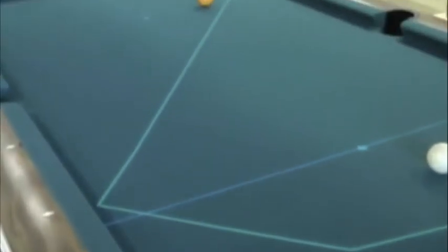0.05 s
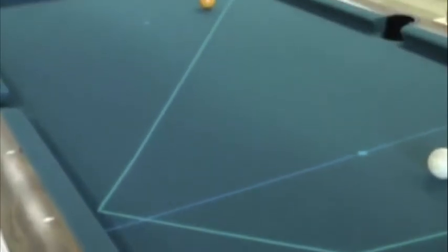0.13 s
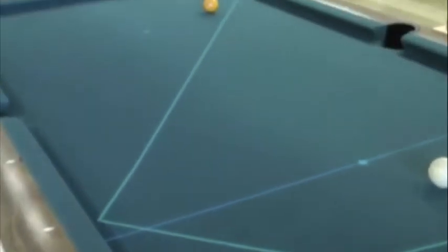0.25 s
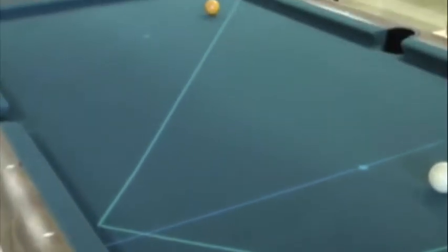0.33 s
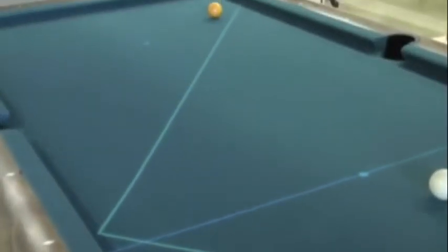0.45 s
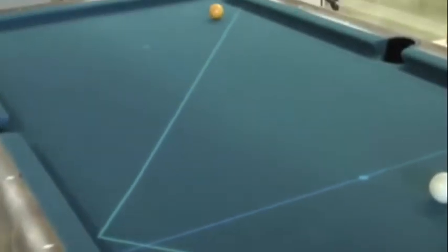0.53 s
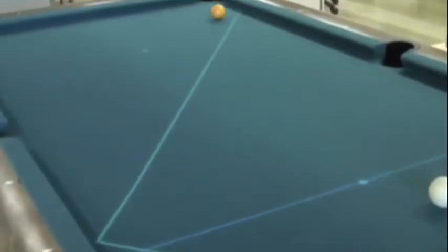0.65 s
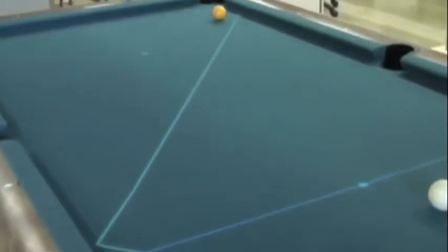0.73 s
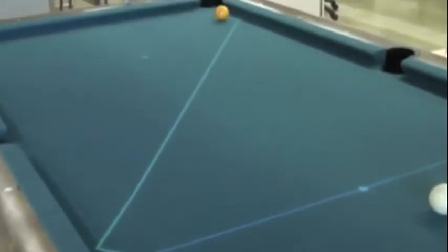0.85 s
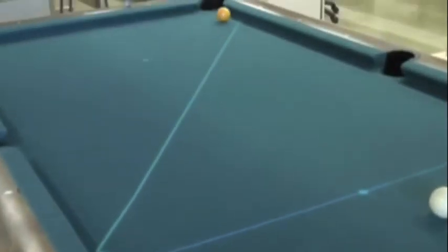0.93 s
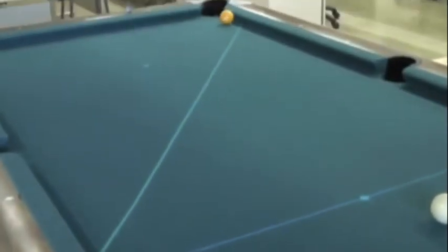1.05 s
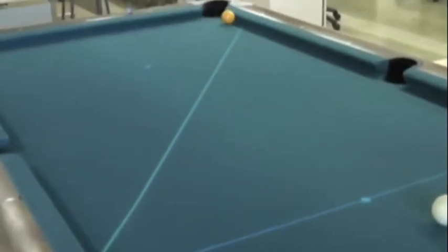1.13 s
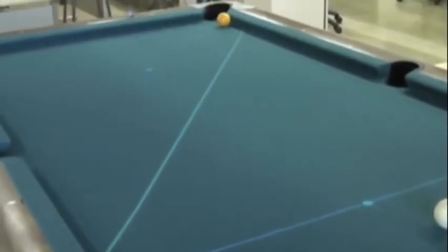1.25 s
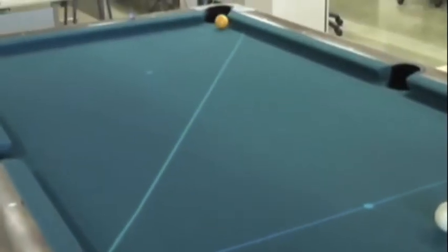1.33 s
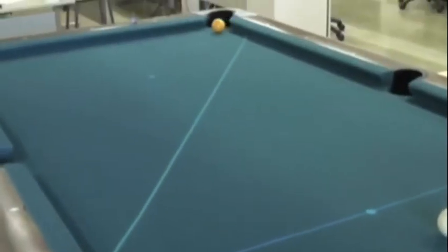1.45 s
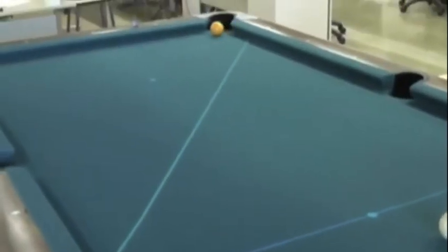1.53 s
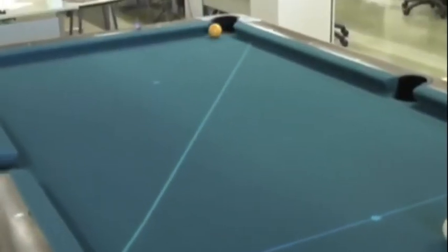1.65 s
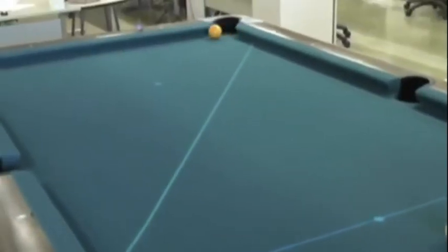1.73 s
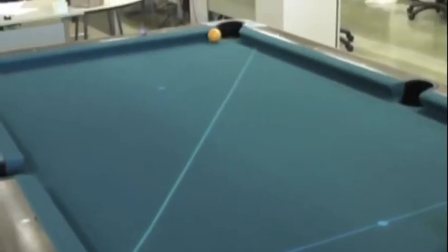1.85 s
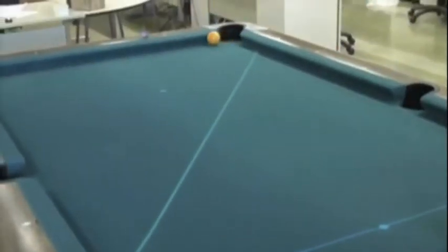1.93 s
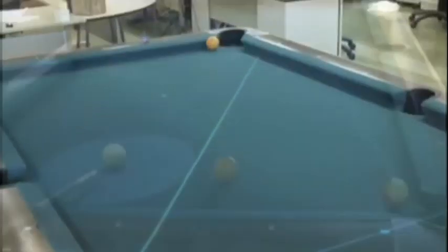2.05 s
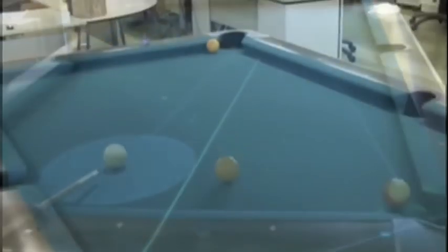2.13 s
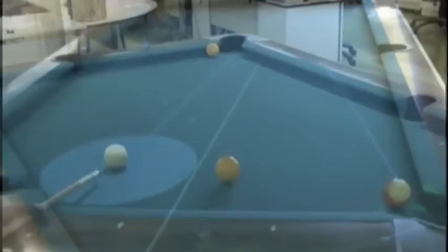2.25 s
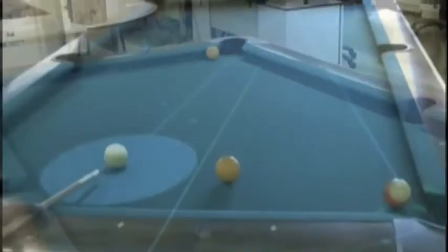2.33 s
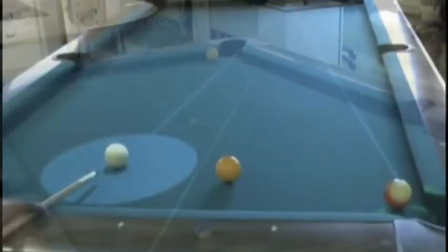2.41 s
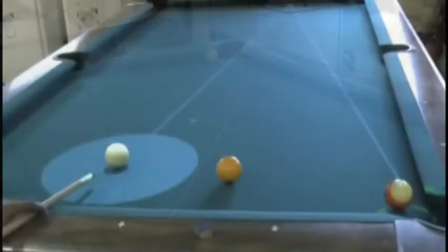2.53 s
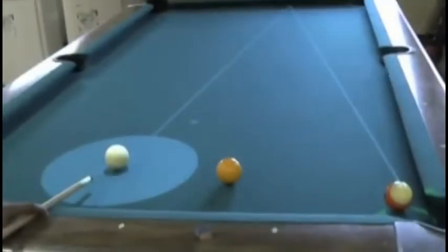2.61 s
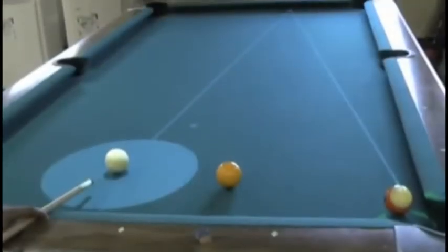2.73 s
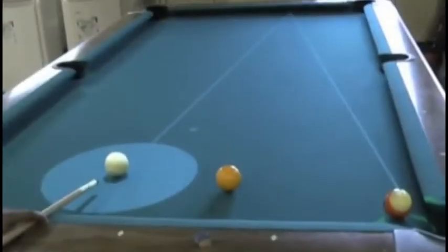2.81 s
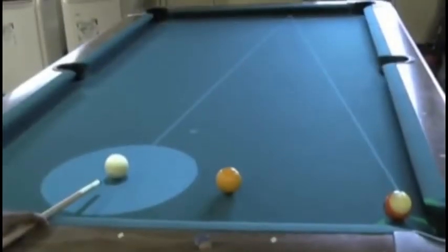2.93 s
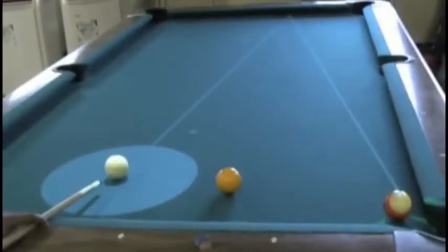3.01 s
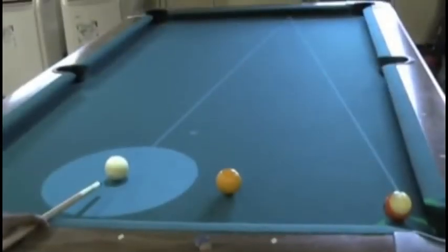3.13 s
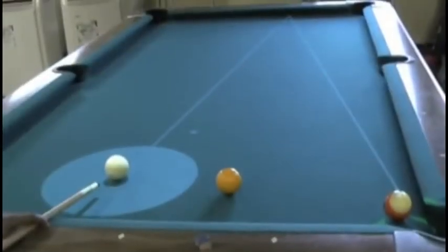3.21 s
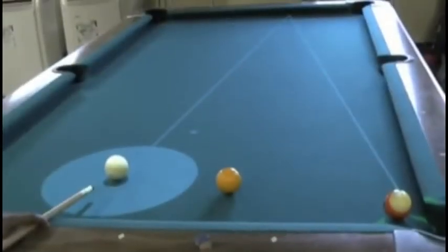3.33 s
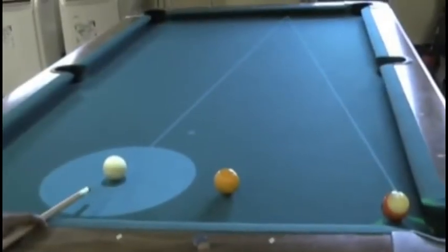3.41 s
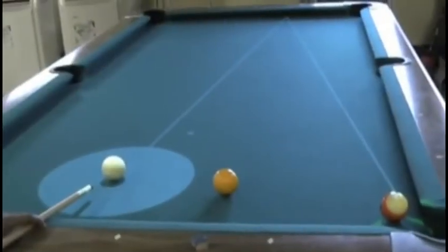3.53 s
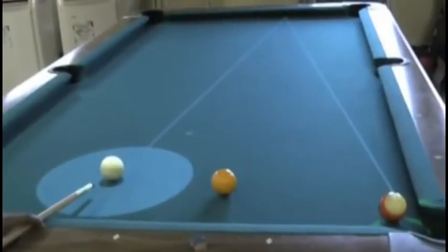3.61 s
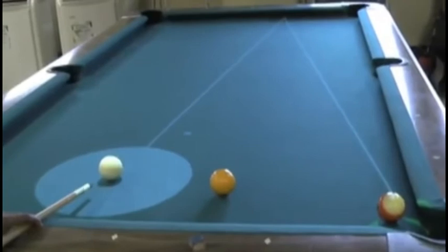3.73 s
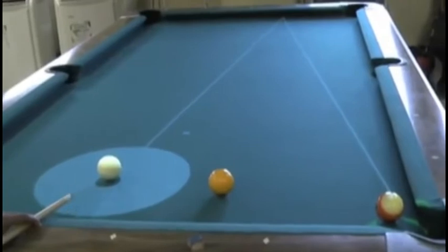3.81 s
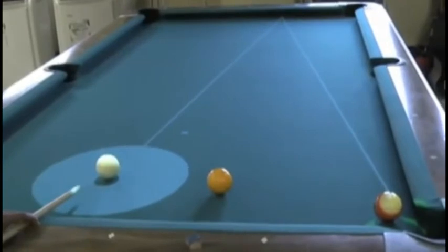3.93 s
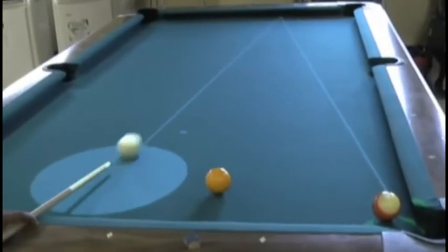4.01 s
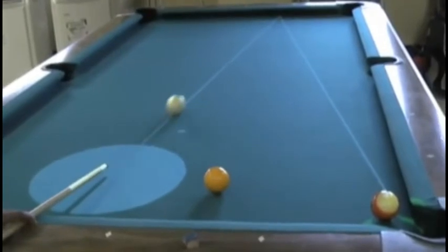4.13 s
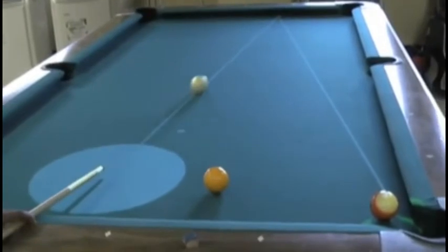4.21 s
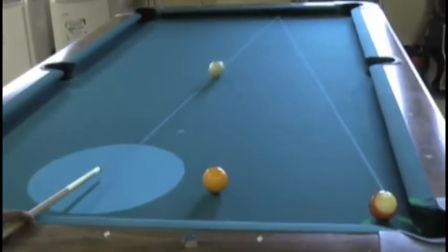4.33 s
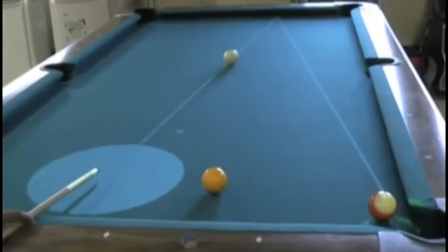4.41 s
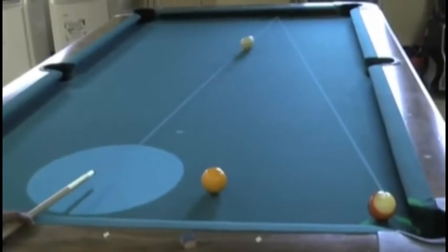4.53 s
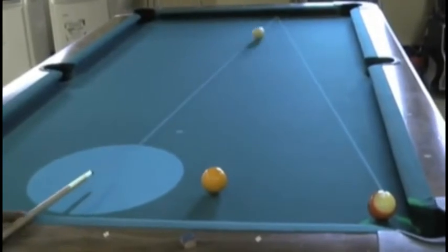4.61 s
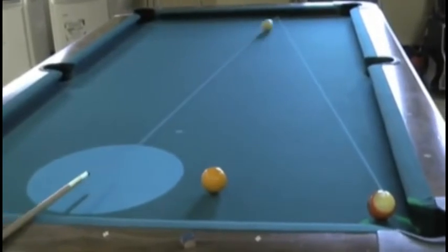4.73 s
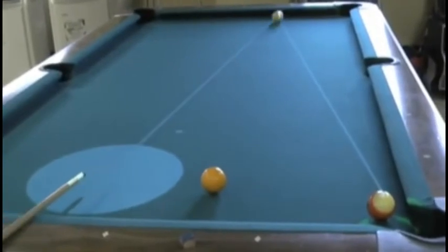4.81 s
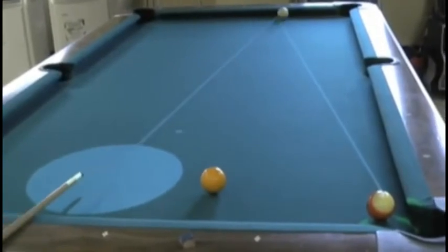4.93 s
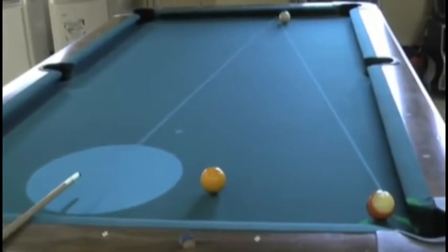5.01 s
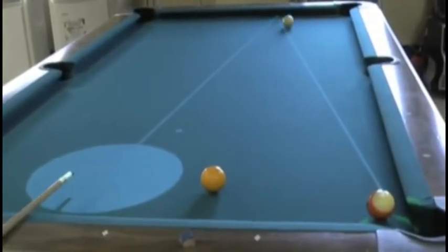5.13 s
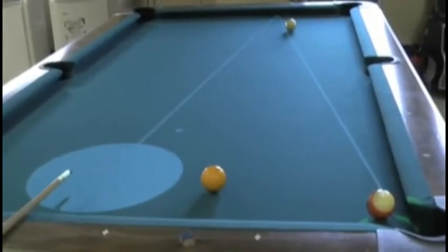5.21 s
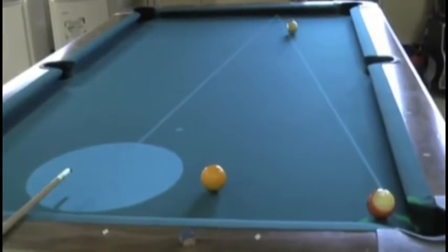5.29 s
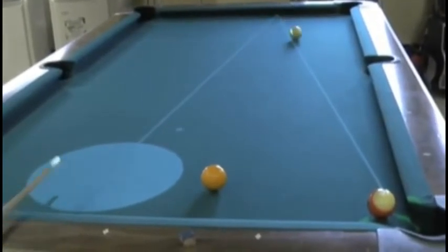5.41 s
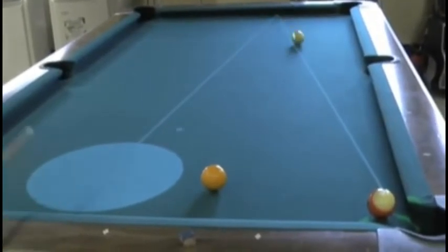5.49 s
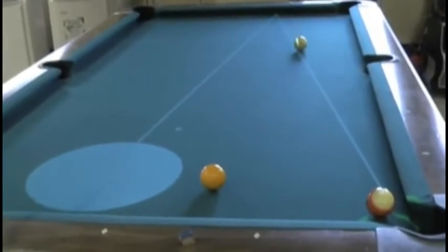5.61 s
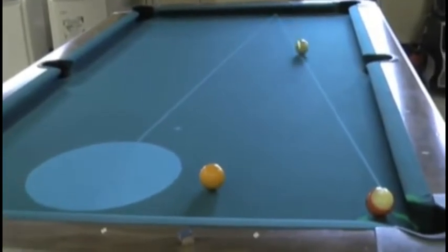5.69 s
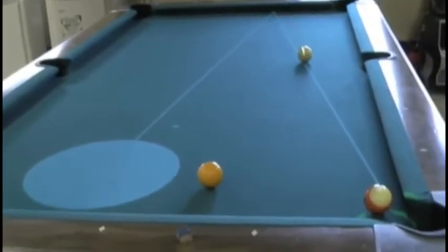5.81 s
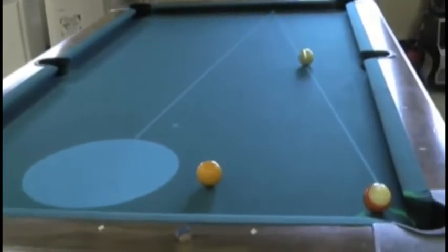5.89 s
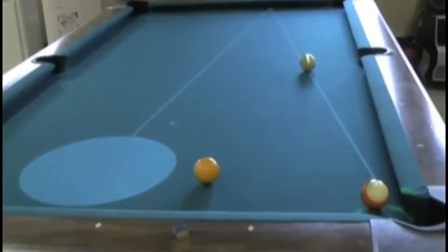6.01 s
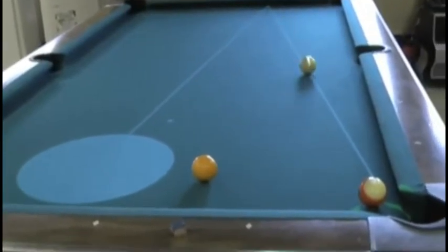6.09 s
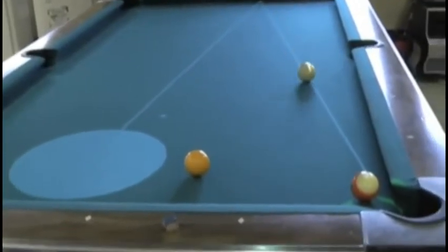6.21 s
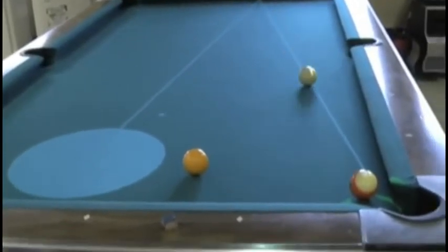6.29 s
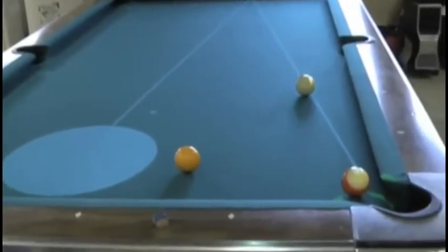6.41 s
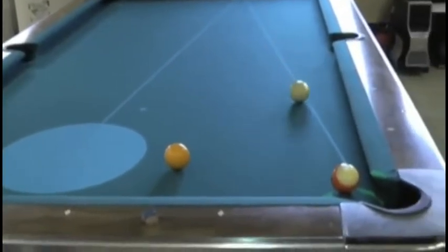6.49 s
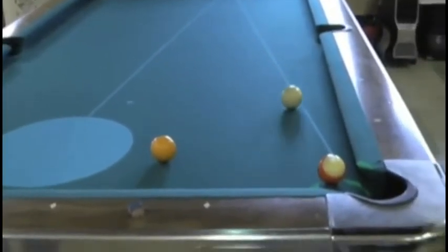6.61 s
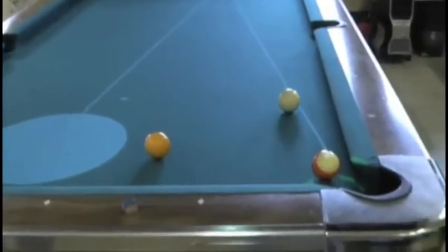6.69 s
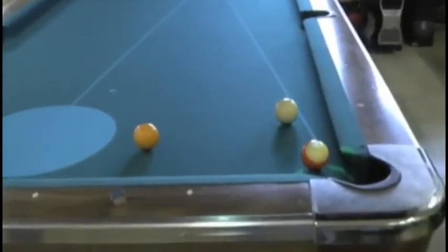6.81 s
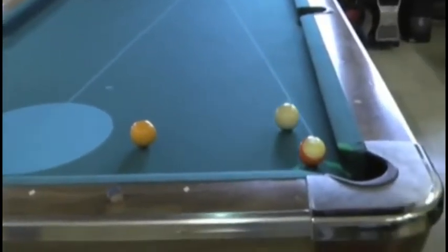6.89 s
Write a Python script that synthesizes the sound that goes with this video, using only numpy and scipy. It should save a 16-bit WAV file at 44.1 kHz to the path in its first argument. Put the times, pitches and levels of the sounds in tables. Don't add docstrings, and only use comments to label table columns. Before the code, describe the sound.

In a large, hard indoor room with steady ventilation, a ball tumbles through a pool table: pocket knocks, chute rattle, heavy tray landing, fading bumps. Then near calm until a crisp cue hit slightly left, faint rolling over cloth, a very high rubber squeak and a dull cushion thump, followed by soft foot scuffs. The small camera microphone thins the treble and briefly mutes before the hardest blows.

```python
import sys
import numpy as np
from scipy import signal
from scipy.fft import rfft, irfft, next_fast_len
from scipy.io import wavfile
from scipy.ndimage import uniform_filter1d

SR = 44100
rng = np.random.default_rng(int(sys.argv[2]) if len(sys.argv) > 2 else 0)


def gain_from_decibels(decibels):
    exponent = np.asarray(decibels, float) / 20
    return 10 ** exponent


def master_out(mix):
    frames = np.transpose(np.atleast_2d(mix))
    ceiling = np.clip(frames, -1, 1)
    pcm = np.round(ceiling * 32767).astype(np.int16)
    wavfile.write(sys.argv[1], SR, pcm)


N = 306495
TIME = np.arange(N) / SR
LEFT_RIGHT = np.array([[1], [-1]])

# (frequency [Hz], level [dB per Hz])
RUMBLE_COLOUR = [(12, -64), (20, -45.5), (82, 1.5), (135, 1), (159, -16), (184, -1), (280, -2.5),
                 (325, -17), (362, -6), (573, -10.5), (1030, -14.5), (1260, -14), (1510, -19), (1600, -20),
                 (2080, -48), (3520, -120)]
HISS_COLOUR = [(940, -32), (1600, -2), (1720, -0.5), (1960, -4), (2310, -4), (3320, -9), (4330, -14),
               (6810, -19), (12100, -20.5), (14500, -28)]
# (frequency [Hz], side minus mid [dB])
AIR_WIDTH = [(60, -18), (110, -19), (200, -14), (370, -5.5), (690, -4), (1260, -6.5), (2320, -6.5),
             (4270, -5.5), (7860, -8.5), (14400, 1)]
# (frequency [Hz], width [Hz], level [dB])
FAN_BANDS = [(285.4, 22, -61.5), (758, 25, -65.5), (1479, 36, -73.5)]
MOTOR_HZ = [934, 1017.5, 1497]
MOTOR_DB = [-65.5, -65.5, -72]
# (start [s], attack [s], hold [s], release [s], level [dB])
HISS_BURSTS = [
    (-.02, 0.016, .005, 0.026, -55),
    (.935, 0.01, 0.0071, 0.023, -49),
    (1.418, 0.0057, 0.024, 0.067, -52),
    (1.469, .005, 0.024, 0.13, -57),
    (1.646, .004, 0.0072, 0.025, -63.5),
    (1.792, 0.0046, 0.01, 0.054, -71),
    (1.4, .15, 0.33, 0.37, -65),
    (2.01, 0.011, 0.047, .1, -69),
    (3.9, 0.079, 0.058, 0.58, -68),
]
# (frequency [Hz], level against the hiss [dB])
BURST_COLOUR = [(3000, -0.5), (7000, 1.5), (11000, 1.5), (13000, -6.5), (14500, -19)]
# (frequency [Hz], time [s])
ROOM_FADE = [(60, 0.51), (250, 0.43), (1000, 0.39), (4000, 0.38), (10000, .35)]
# (frequency [Hz], side minus mid [dB])
ROOM_WIDTH = [(60, -16.5), (500, -17), (1000, -11), (2500, -8.5), (8000, -9.5), (13000, -7.5)]
# (time [s], length [s], start [Hz], end [Hz], peak level [dB])
SQUEAKS = [
    (4.66, 0.016, 8700, 8000, -42.5),
    (4.682, 0.015, 8800, 7950, -38.5),
    (4.696, 0.0062, 8700, 9200, -41),
    (4.699, 0.017, 9100, 8950, -31.5),
    (4.722, 0.015, 9740, 9490, -30),
    (4.737, 0.011, 9430, 10470, -31.5),
    (4.775, .03, 2940, 2750, -58.5),
]
# (start [s], attack [s], hold [s], release [s], level [dB])
SCUFFS = [
    (4.6, 0.041, 0.18, 0.051, -70.5),
    (5.96, 0.13, 0.086, .075, -61),
    (6.39, 0.0079, .002, 0.15, -69.5),
    (6.525, 0.027, 0.0017, 0.14, -68.5),
]
# (frequency [Hz], level [dB per Hz])
SCUFF_COLOUR = [(1180, -36), (2000, -5), (2500, -3), (3370, -8), (3790, -5.5), (9420, -6.5), (12700, -8),
                (14500, -29)]
# (frequency [Hz], level [dB])
CUE_TIP = [(35, -45), (100, -30), (250, -4.5), (460, -2.5), (730, 2), (1500, -2), (1900, -15.5), (3250, -6),
           (4000, -11), (6400, -13), (7300, -27.5), (11000, -28), (14900, -44)]
# (frequency [Hz], level [dB], time to fade 60 dB [s])
CUE_SHAFT = [(116, -10, 0.87), (238, -4.5, 0.26), (363, -7, 0.2), (763, 5.5, 0.036), (1240, -12, 0.043),
             (1497, 6, 0.057), (2470, -2.5, 0.05), (3200, -9, 0.022)]
# (frequency [Hz], level [dB], time to fade 60 dB [s])
CUSHION_FRAME = [(70.6, -27, 0.2), (107.3, -7.5, 0.38), (133.4, 3, 0.26), (218.6, -1, 0.155),
                 (293, -8, 0.154), (410, 0.5, 0.036), (557, -10.5, 0.044), (755, -3.5, 0.052),
                 (1160, -10, 0.036), (1490, -15, 0.019), (2100, -27, .02)]
# (time [s], level [dB])
CUSHION_HITS = [
    (4.866, -3),
    (4.876, -2.5),
    (4.887, -5.5),
]
# (frequency [Hz], level [dB], time to fade 60 dB [s])
CABINET = [(68.4, -16, 0.084), (102.3, -11.5, 0.27), (124.7, -5.5, 0.16), (172.8, 0, 0.11),
           (203.4, -2, 0.081), (258, 1, 0.12), (297.3, -4, 0.16), (337.4, 1, 0.092)]
PANEL = [(419, -5, 0.054), (469.5, -9, 0.061), (547.3, 0.5, 0.058), (573.5, -2, 0.073), (637, -6, 0.071),
         (687.6, -0.5, 0.056), (738, -8, 0.062), (809, -7.5, 0.038), (844, -11, 0.063)]
RAIL = [(968, 2.5, 0.032), (1083, 4, 0.056), (1154, 0, 0.051), (1265, -2.5, 0.035), (1360, -1, .04),
        (1384, -1, 0.061), (1523, -0.5, 0.052), (1645, -4.5, 0.02), (1990, -6, .03), (2180, -8.5, 0.02)]
# (frequency [Hz], level [dB])
CRACK_COLOUR = [(1300, -7.5), (1900, 6), (2600, 8), (3500, -1.5), (5000, -12), (7500, -18.5),
                (11000, -32.5), (15000, -58)]
# (time [s], strength [dB], share reaching the cabinet [dB], hardness [dB])
POCKET = [
    (0.0001, -26.5, 0, -4.5),
    (0.106, -20, -27, 6.5),
    (0.242, -18, 0.5, -4),
    (0.245, -29.5, -3, -20),
    (0.265, -24, -5, -1.5),
    (0.299, -31.5, 6.5, -17),
    (0.468, -42, 3, -14),
    (.481, -38.5, 4, -9),
    (.626, -38, 2, -16),
]
CHUTE = [
    (0.832, -14.5, -12, -0.5),
    (0.84, -11, -6.5, -6),
    (.855, -20.5, -4.5, -10),
    (0.931, -24.5, -5, 2.5),
    (.944, -12, -11.5, 3),
    (0.949, -8, -13.5, 1.5),
    (0.968, -20.5, 0.5, -11),
    (0.999, -21.5, 0, -8),
]
TRAY = [(1.426, -4.5, -7, -11), (1.444, -16.5, -5.5, -15), (1.483, -8, -11, -3.5), (1.519, -17.5, 2.5, 0.5),
        (1.586, -12, -1, -19), (1.598, -12, -6, -22), (1.661, -23.5, 7.5, -12), (1.694, -30.5, 3.5, -20.5),
        (1.713, -19.5, -1, -16), (1.725, -25, 3.5, -19), (1.797, -21.5, 5, -30), (1.86, -31.5, 8, -17),
        (1.903, -37, 8.5, -24)]
# (time [s], strength [dB], hardness [dB], crack [dB])
TICKS = [
    (0.752, -44.5, 3.5, -9),
    (2.019, -39.5, -12.5, 6.5),
    (5.094, -48, 0, -8),
    (6.402, -60, -9, 17),
    (6.537, -62.5, 25, -20),
    (6.554, -43, -1, -2),
]
# (start [s], length [s], start level [dB], end level [dB], panel share [dB])
ROLLS = [
    (0.02, 0.062, -40, -41, 3.5),
    (.42, 0.206, -43.5, -37, 0.5),
    (.63, 0.18, -37.5, -52, -5),
    (1.62, 0.29, -26.5, -34.5, -16),
    (1.92, .18, -37.5, -49.5, -21),
    (2.1, .34, -56, -59, -2),
    (4.05, 0.053, -40.5, -56, -25),
    (4.2, 0.393, -49, -51, -12),
    (4.63, 0.215, -46, -45, -13.5),
    (4.95, 0.13, -54, -58, -29),
]
# (start [s], length [s], start [dB], end [dB], panel share [dB])
CHATTER = [
    (0.139, 0.077, -22, -66, 2),
    (.3, 0.063, -41, -49, -7),
    (.865, 0.056, -38, -34, -2),
    (.985, 0.18, -26.5, -49, -14),
    (1.531, 0.085, -26.5, -36.5, 0.5),
]
# (frequency [Hz], left minus right [dB])
PORT_BALANCE = [(60, -1.5), (110, -3), (200, -1.5), (370, 1), (690, 0.5), (1260, 0.5), (2320, 0),
                (4270, 0.5), (7860, 0.0), (14400, 0.5)]
# (start [s], length [s])
SILENCES = [
    (0.829, 0.00086),
    (1.411, 0.01),
    (3.918, 0.011),
]
# (frequency [Hz], threshold against neighbouring lines [dB])
TREBLE_LOSS = [(3000, -23), (4500, -1), (9000, -4), (11500, -0.5), (13000, .5), (14500, -1)]
# (frequency [Hz], raised threshold [dB])
LOUD_LOSS = [(4500, -0.5), (7000, 3.5), (10500, 3.5), (12000, 2.5)]


def unit(x):
    return x / np.sqrt(np.mean(x ** 2))


def unit_energy(x):
    return x / np.sqrt(np.sum(x ** 2))


def colour(x, table, scale=1):
    hz, db = np.transpose(table)
    size = next_fast_len(x.shape[-1])
    log_hz = np.log(np.fft.rfftfreq(size, 1 / SR) + 1)
    gain = gain_from_decibels(scale * np.interp(log_hz, np.log(hz), db))
    return irfft(rfft(x, size) * gain, size)[..., :x.shape[-1]]


def curve(times, db):
    return gain_from_decibels(np.interp(TIME, times, db, left=-200, right=-200))


def swells(rows):
    return sum(curve(np.cumsum(row[:-1]), row[-1] - 24 * np.array([1, 0, 0, 1])) for row in rows)


def walk(rate_hz):
    step = int(SR / rate_hz)
    levels = np.repeat(rng.standard_normal(N // step + 1), step)
    return 0.74 * uniform_filter1d(levels, step)[:N]


def add(track, s, sound):
    i = max(int(s * SR), 0)
    track[i:i + len(sound)] += sound[:N - i]


def ring(modes, dense_db=-1, size=10000):
    t = np.arange(size) / SR
    strong = 0
    for k, (hz, db, t60) in enumerate(modes):
        strong = strong + (-1) ** k * gain_from_decibels(db - 60 * t / t60) * np.sin(2 * np.pi * hz * t)
    hz, db, t60 = np.transpose(modes)
    below = (hz[0] / 1.77, db[0] - 18.5)
    above = [(hz[-1] * 1.55, db[-1] - 15.5), (hz[-1] * 4, -90)]
    crowd = colour(rng.standard_normal(size), [below, *zip(hz, db), *above])
    crowd = crowd * gain_from_decibels(-60 * t / (1.38 * np.median(t60)))
    crowd = crowd * (1 - np.exp(-t * hz[0] * 3)) ** 2
    return unit_energy(unit(strong) + gain_from_decibels(dense_db) * unit(crowd))


def rattle(rise, fall, scatter_db, main_db=0):
    t = np.arange(int(.06 * SR)) / SR
    contacts, strengths = rng.standard_normal((2, len(t)))
    shape = np.minimum(t / (2 * rise), 1) ** 2 * np.exp(-np.maximum(t - 2 * rise, 0) / fall)
    y = unit_energy(shape * contacts * gain_from_decibels(scatter_db * strengths))
    y[int(2 * rise * SR)] += gain_from_decibels(main_db)
    for _ in range(3):
        spectrum = rfft(y)
        y = irfft(spectrum / (np.abs(spectrum) + .1), len(t))
        y = unit_energy(y * np.minimum(shape * 6, 1))
    return y


def motor():
    out = np.zeros(N)
    for hz, width, db in FAN_BANDS:
        band = signal.lfilter(*signal.iirpeak(hz, hz / width, SR), rng.standard_normal(N))
        out += gain_from_decibels(db) * unit(band)
    for hz, db in zip(MOTOR_HZ, MOTOR_DB):
        phase = 2 * np.pi * np.cumsum(hz + 1.24 * walk(2.954)) / SR
        out += gain_from_decibels(db + 1.5 + 0.74 * walk(3.3)) * np.sin(phase)
    return out


def wide_noise(table):
    mid, side = colour(rng.standard_normal((2, N)), table)
    return (mid + LEFT_RIGHT * colour(side, AIR_WIDTH)) / np.std(mid)


def air():
    rumble = wide_noise(RUMBLE_COLOUR) * gain_from_decibels(-51 - 2.0 + 1.0 * walk(2.99))
    hiss = wide_noise(HISS_COLOUR) * gain_from_decibels(5.5)
    bursts = colour(hiss[:, ::-1], BURST_COLOUR) * swells(HISS_BURSTS)
    sag_db = -3.5 * np.exp(-((TIME - 2.26) / 0.33) ** 2)
    return rumble + hiss * gain_from_decibels(-70 + sag_db) + bursts + motor()


def room(x, gap=.002):
    t = np.arange(int(.7 * SR)) / SR
    mid, side = rng.standard_normal((2, len(t)))
    noise = mid + colour(side, ROOM_WIDTH) * LEFT_RIGHT
    fade_hz, fade_s = np.transpose(ROOM_FADE)
    echo = 0
    for hz in 62.5 * 2. ** np.arange(8):
        t60 = np.interp(np.log(hz), np.log(fade_hz), fade_s)
        top_hz = hz * np.sqrt(2) * (1.5 if hz > 5000 else 1)
        band = signal.butter(2, [hz / np.sqrt(2), top_hz], "band", fs=SR, output="sos")
        fade = gain_from_decibels(-60 * t / t60) + gain_from_decibels(-0.5 - 60 * t / 0.14)
        echo = echo + signal.sosfilt(band, noise) * fade
    spectrum = rfft(echo * (t > gap))
    power = np.abs(spectrum[0]) ** 2
    echo = irfft(spectrum / np.sqrt(uniform_filter1d(power, size=14) + .1 * np.mean(power)), len(t))
    echo = echo * (t > gap) * np.clip((.6 - t) / .2, 0, 1)
    echo = echo / np.sqrt(np.sum(echo[0] ** 2))
    return signal.fftconvolve(x.mean(axis=0)[None], echo)[:, :N]


def shoe():
    squeak, wobble_hz = np.zeros(N), 35 * walk(600)
    for s, length, start_hz, end_hz, db in SQUEAKS:
        u = np.arange(int(length * SR)) / (length * SR)
        i = int(s * SR)
        hz = start_hz + (end_hz - start_hz) * u + wobble_hz[i:i + len(u)]
        phase = 2 * np.pi * np.cumsum(hz) / SR
        beat = 2 * np.pi * 3870 * u * length
        tone = np.sin(phase) + gain_from_decibels(-26) * np.sin(phase - beat) + gain_from_decibels(-36) * np.sin(phase + beat)
        squeak[i:i + len(u)] += gain_from_decibels(db) * np.sin(np.pi * u) ** 0.32 * tone
    fuzz = unit(signal.lfilter(*signal.butter(1, 1200, fs=SR), rng.standard_normal(N)))
    squeak = squeak * (gain_from_decibels(1.3 * walk(350)) + gain_from_decibels(-19) * fuzz)
    drag = unit(colour(rng.standard_normal(N), SCUFF_COLOUR)) * gain_from_decibels(1.5 * walk(64))
    return squeak + gain_from_decibels(6.0) * swells(SCUFFS) * drag


def tip_click():
    hz, db = np.transpose(CUE_TIP)
    log_hz = np.log(np.fft.rfftfreq(4096, 1 / SR) + 1)
    cepstrum = irfft(np.interp(log_hz, np.log(hz), db) * np.log(10) / 20)
    fold = np.r_[1, 2 * np.ones(2047), 1, np.zeros(2047)]
    return unit_energy(irfft(np.exp(rfft(cepstrum * fold))))


def cue():
    strike_s, click = 3.9337, tip_click()
    push = signal.sosfilt(signal.butter(2, 1700, fs=SR, output="sos"), click)
    bright = signal.sosfilt(signal.butter(2, 1700, "high", fs=SR, output="sos"), click)
    scatter = signal.fftconvolve(bright, rattle(0.00052, 0.00076, 2.1, -10))
    out = np.zeros(N)
    add(out, strike_s - .0004, gain_from_decibels(-2.0) * scatter)
    add(out, strike_s + 0.001137, push)
    add(out, strike_s + 0.00064, -gain_from_decibels(-5.5) * ring(CUE_SHAFT, -1.0))
    return gain_from_decibels(6.5) * out


def cushion():
    out = np.zeros(N)
    for s, db in CUSHION_HITS:
        push = rattle(0.00431, 0.011, 3, 4.6)
        add(out, s - .008, gain_from_decibels(db) * signal.fftconvolve(push, ring(CUSHION_FRAME, -13)))
    return out


def travel(force, modes, dense_db):
    angle = 2 * np.pi * 2.3 * TIME
    shares = np.cos(angle), np.sin(angle)
    return sum(signal.fftconvolve(force * share, ring(modes, dense_db))[:N] for share in shares)


def rolling_force(bumps, rows, share):
    level = sum(curve([s, s + length], [a, b]) * gain_from_decibels(share * panel) for s, length, a, b, panel in rows)
    return bumps * uniform_filter1d(level, int(0.024 * SR))


def rolling():
    bumps = unit(rng.standard_normal(N) * gain_from_decibels(6.0 * walk(60) + 2.74 * walk(18)))
    roll = rolling_force(bumps, ROLLS, 0)
    chatter = rolling_force(bumps, CHATTER, 0)
    panel = rolling_force(bumps, ROLLS + CHATTER, 0.76)
    wood = gain_from_decibels(-1.0) * travel(roll + gain_from_decibels(-3) * chatter, CABINET, 3.6)
    wood += gain_from_decibels(-8.5) * travel(panel, PANEL, 2)
    wood += gain_from_decibels(-8.0) * travel(gain_from_decibels(-24.5) * roll + gain_from_decibels(-5) * chatter, RAIL, 3.7)
    return wood + gain_from_decibels(0.5) * colour(gain_from_decibels(-47) * roll + gain_from_decibels(-18.5) * chatter, CRACK_COLOUR)


def blows(rise=.003):
    out, cracks = np.zeros(N), np.zeros(N)
    push = signal.butter(2, 2600, fs=SR)
    stages = (POCKET, -16), (CHUTE, -27), (TRAY, -20.5)
    rows = [(*row, crack) for stage, crack in stages for row in stage]
    rows += [(s, db, -3, hard, crack) for s, db, hard, crack in TICKS]
    for s, db, low, hard, crack in sorted(rows):
        force = gain_from_decibels(db - 3.5) * rattle(rise, 0.0041, 5.1, 4.0)
        spot_hz = 1060 * 2 ** (.05 * max(hard, 0))
        rail_modes = [(hz, g - 9 * abs(np.log2(hz / spot_hz)), t60) for hz, g, t60 in RAIL]
        body = gain_from_decibels(low + 23) * ring(CABINET, 0)
        body = body + gain_from_decibels(21) * ring(PANEL, .7)
        body = body + gain_from_decibels(hard + 18.5) * ring(rail_modes, 0.92)
        add(out, s - 2 * rise, signal.fftconvolve(signal.lfilter(*push, force), body))
        add(cracks, s - 2 * rise, gain_from_decibels(crack + hard + 26.5) * force)
    return out + colour(cracks, CRACK_COLOUR)


def table():
    return (blows() + rolling()) * gain_from_decibels(.5 * LEFT_RIGHT) + cushion()


def scene():
    wood = table()
    tip = cue() * gain_from_decibels(4 / 2 * LEFT_RIGHT)
    foot = shoe() * np.ones((2, 1))
    echoes = room(gain_from_decibels(2.0) * wood + gain_from_decibels(-5.5) * tip + gain_from_decibels(-9.0) * foot)
    return wood + tip + foot + echoes + air()


def thin_treble(x, size=2048):
    hz, _, lines = signal.stft(x, SR, nperseg=size)
    raw = np.abs(lines[0] + lines[1]) ** 2
    power = uniform_filter1d(uniform_filter1d(raw, size=3, axis=0), size=3, axis=1)
    around = uniform_filter1d(power, size=40, axis=0)
    loud_db = 10 * np.log10(uniform_filter1d(power.sum(axis=0), size=5) + 1e-12)
    busy = np.clip((loud_db - np.median(loud_db) - 10.5) / 12, 0, 1)
    limit_db = np.interp(hz, *np.transpose(TREBLE_LOSS), left=-99)[:, None]
    limit_db = limit_db + np.interp(hz, *np.transpose(LOUD_LOSS))[:, None] * busy
    treble = raw[hz > 3000].sum(axis=0)
    attack = treble > 6 * np.roll(treble, 1)
    kept = (power >= gain_from_decibels(limit_db) ** 2 * around) | attack | np.roll(attack, 1)
    left_over = np.abs(uniform_filter1d(power * kept, size=40, axis=0))
    refill = np.sqrt(np.abs(around) / (left_over + 1e-18))
    return signal.istft(lines * kept * np.clip(refill, 1, 2.3), SR, nperseg=size)[1][:, :N]


def top_cut(x):
    return signal.sosfilt(signal.butter(12, 15050, fs=SR, output="sos"), x)


def record(dry):
    x = np.array([colour(dry[0], PORT_BALANCE, .5), colour(dry[1], PORT_BALANCE, -.5)])
    gate = np.prod([(TIME < s) | (TIME > s + length) for s, length in SILENCES], axis=0)
    x = thin_treble(x) * uniform_filter1d(gate * 1., size=60)
    mix = np.tanh(1.176 * x) / 1.058
    return top_cut(mix)


dry = scene()
out = record(dry)
master_out(out)
```